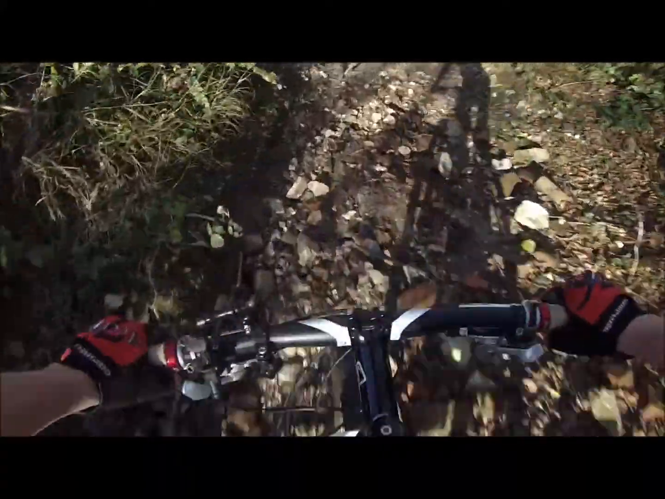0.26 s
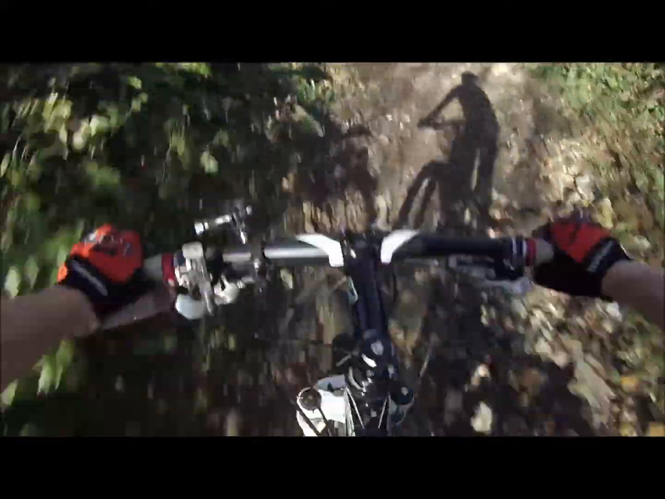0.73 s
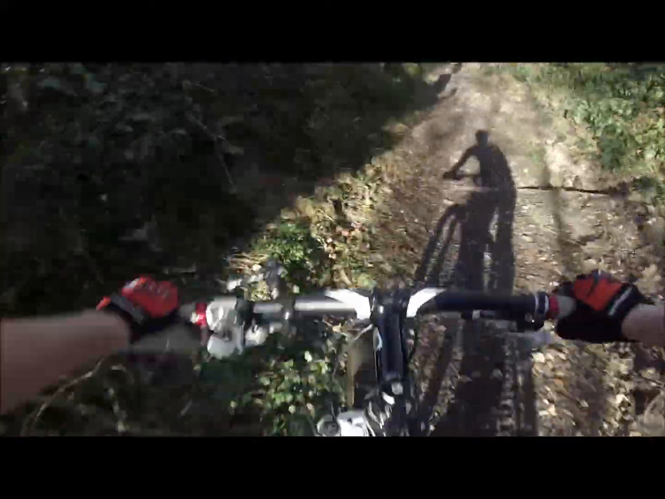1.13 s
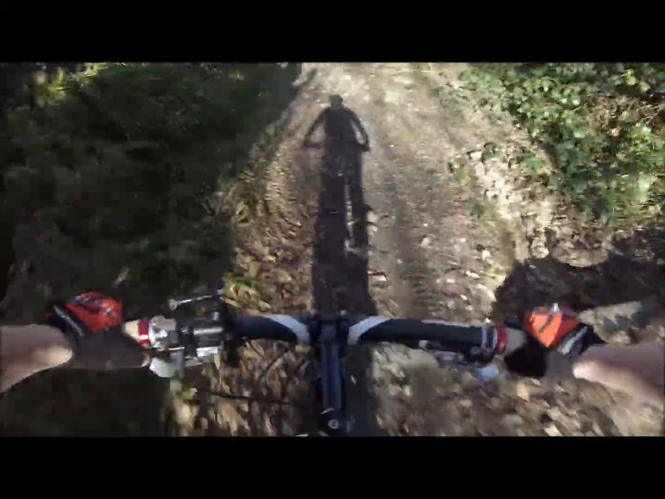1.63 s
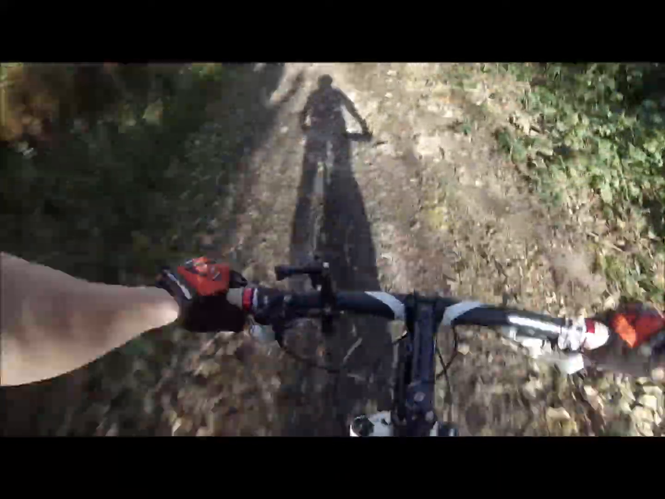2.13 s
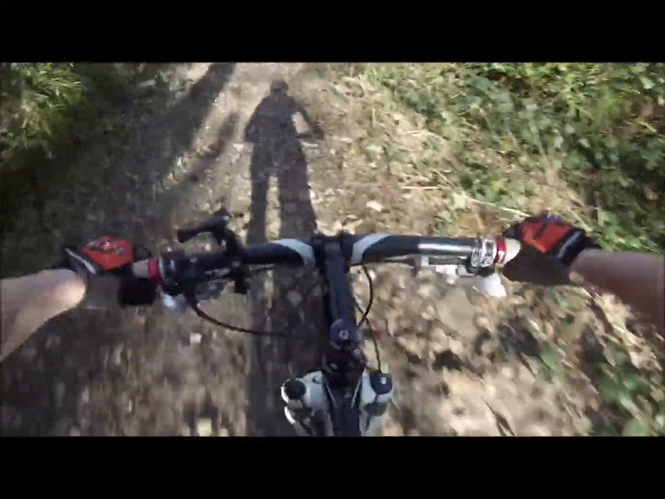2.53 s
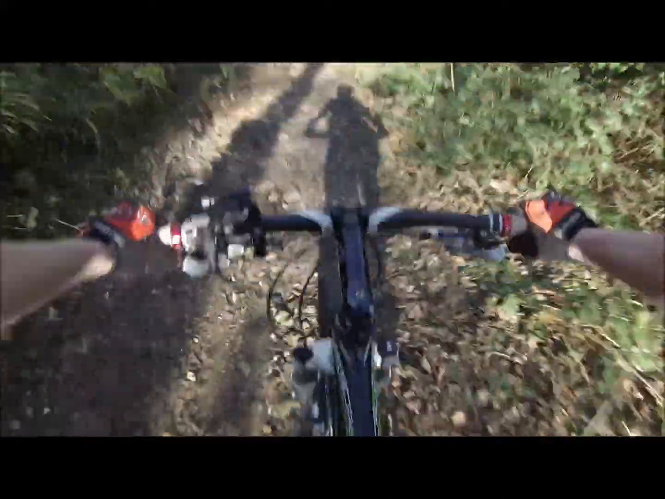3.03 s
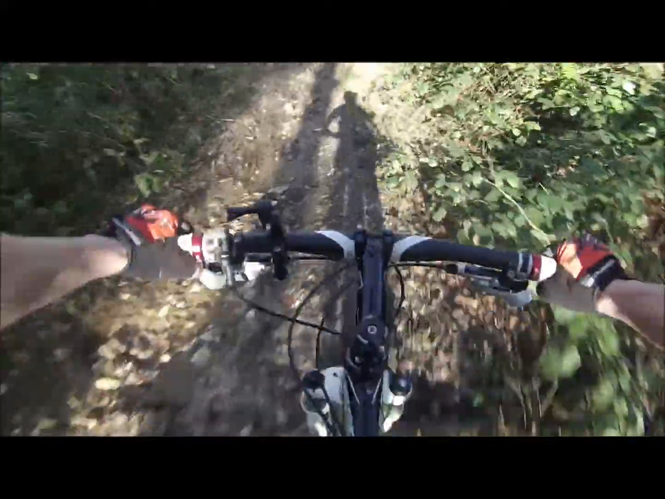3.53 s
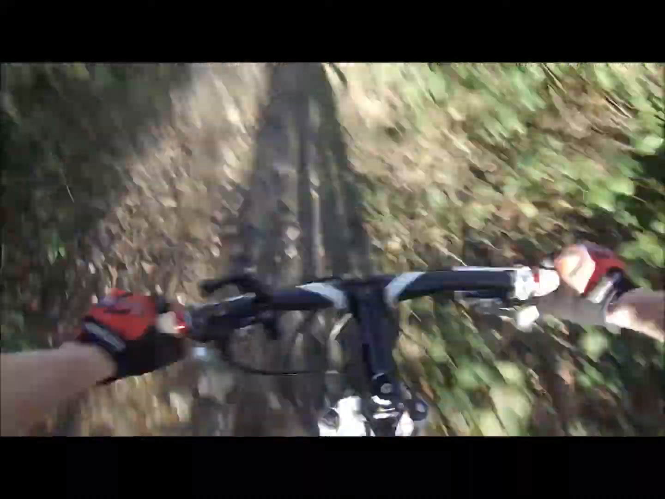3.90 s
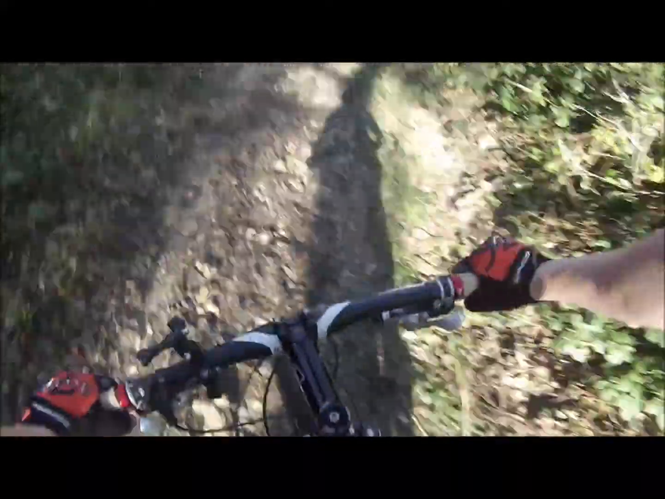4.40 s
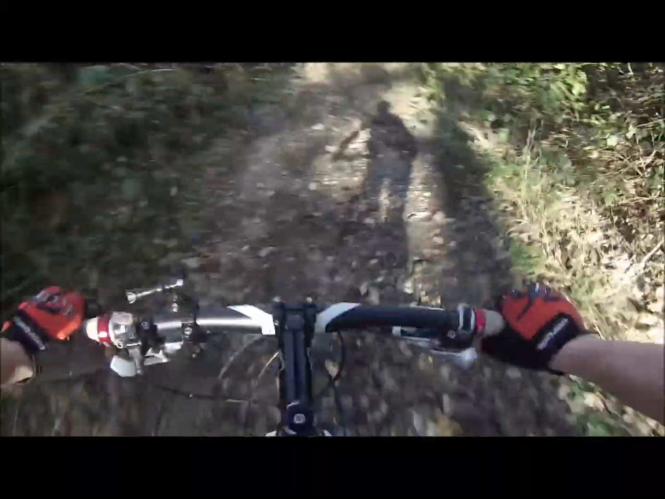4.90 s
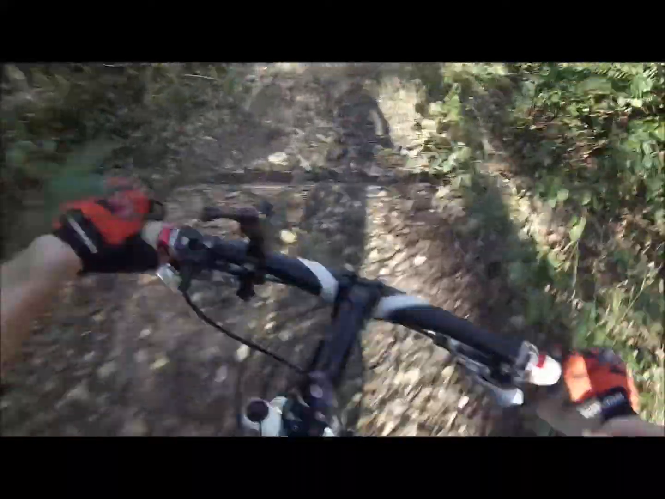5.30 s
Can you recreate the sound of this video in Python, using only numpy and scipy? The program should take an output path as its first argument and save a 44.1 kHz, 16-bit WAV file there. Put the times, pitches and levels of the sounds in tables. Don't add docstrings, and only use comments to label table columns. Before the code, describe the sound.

Muffled rough bike ride heard from inside a plastic housing: dense scratchy creaking, low tyre rumble, heavy jolts and short hollow clacks.

```python
import sys
import numpy as np
from scipy import signal
from scipy.fft import rfft, irfft
from scipy.io import wavfile
from scipy.ndimage import uniform_filter1d

SR = 44100
rng = np.random.default_rng(int(sys.argv[2]) if len(sys.argv) > 2 else 0)


def put_to_file(sound):
    columns = np.atleast_2d(sound).T
    safe = np.clip(columns, -1, 1)
    whole_steps = np.round(safe * 32767)
    wavfile.write(sys.argv[1], SR, whole_steps.astype(np.int16))


def invert_db(level):
    return 10 ** (np.asarray(level, dtype=float) / 20)


N = 244755


def evened(x):
    return x / np.sqrt(np.mean(x ** 2) + 1e-20)


def add(mix, s, sound):
    part = mix[max(round(s * SR), 0):][:len(sound)]
    part += sound[:len(part)]


def control(curve):
    return np.interp(np.arange(N) / SR, *np.transpose(curve))


def humps(rows, column):
    t = np.arange(0, N + 64, 64) / SR
    db = sum(row[column] * np.exp(-((t - row[0]) / row[-1]) ** 2) for row in rows)
    return np.interp(np.arange(N) / SR, t, db)


def flutter(span_s, depth_db):
    size = max(int(span_s * SR), 2)
    drift = uniform_filter1d(uniform_filter1d(rng.standard_normal(N), size), size)
    return invert_db(depth_db * np.clip(evened(drift), -3, 1.6))


def coloured(points):
    hz, db = np.transpose(points)
    bins_hz = np.fft.rfftfreq(N, 1 / SR)
    gain = invert_db(np.interp(np.log(bins_hz + 1), np.log(hz + 1), db))
    return evened(irfft(rfft(rng.standard_normal(N)) * gain, N))


def resonances(x, table):
    out = np.zeros(N)
    for k, (hz, width_hz, db) in enumerate(table):
        b, a = signal.iirpeak(hz, hz / (1.69 * width_hz), SR)
        excited = x * flutter(0.013, 2.26)
        twice = signal.lfilter(b, a, signal.lfilter(b, a, excited))
        out += (-1) ** k * invert_db(db) * evened(twice)
    return out


# [t/s, chafing level/dB]
MOUNT_PRESSURE = [(0.0, -46.5), (0.14, -42.5), (0.46, -40.5), (0.94, -42), (1.95, -45.5), (2.19, -46),
                  (2.3, -46), (2.4, -44.5), (3.09, -41.5), (3.23, -42.5), (3.41, -48), (3.73, -43.5),
                  (3.85, -48), (3.96, -46), (4.48, -44.5), (4.71, -39.5), (4.81, -44.5), (5.55, -44.5)]
# [t/s, mount level/dB, ground level/dB, half length/s]
LULLS = [(.22, -3, -6, 0.037), (.255, -9.5, -2, .02), (.46, -2, -6, 0.028), (1.03, -5, 0.5, .03),
         (1.52, -3, -2.5, 0.03), (1.93, -6.5, -0.5, 0.055), (2.3, -4.5, -3, 0.044), (2.6, -6, -2.5, 0.043),
         (3.47, -2.5, -5, 0.037), (3.54, -3.5, -6, 0.087), (3.91, -7, -11, 0.036), (4.24, -3, -11, 0.047),
         (4.93, -6.5, -5.5, 0.026), (5.33, -2.5, -4, 0.048), (5.49, -4.5, -1, 0.023)]
# [t/s, treble peak level/dB, body relative level/dB, length/s]
SCRAPES = [(.273, -28, 4, 0.029), (0.38, -25, -19, 0.018), (0.536, -34, 16.5, 0.014),
           (0.578, -34.5, 11, 0.019), (0.733, -23, -1, 0.027), (0.7965, -27.5, 3.5, 0.023),
           (0.8626, -31.5, 8.5, 0.052), (1.114, -23.5, 2.5, 0.03), (1.32, -33, 4, 0.05),
           (1.493, -32.5, 0, .027), (2.065, -36.5, 0, .057), (2.781, -34, 14, 0.017),
           (2.906, -32, -3, 0.044), (3.069, -28, 3, 0.029), (3.142, -23.5, 4.5, 0.037),
           (3.2823, -24.5, 6.5, 0.025), (3.365, -24.5, 5.5, .036), (3.601, -32.5, 2, .051),
           (3.699, -31.5, 7, .026), (3.846, -30.5, 10, 0.023), (3.9538, -28, 8, 0.028),
           (4.108, -28, 2.5, 0.049), (4.527, -34.5, 7.5, 0.027), (4.751, -28, -0.5, 0.052),
           (4.822, -28, 7.5, 0.026), (4.898, -22, 7, .024), (5.046, -27, 0.2, 0.039), (5.13, -25, 0, 0.023),
           (5.218, -28.5, 3, .033), (5.5403, -27, 6, .032)]
# [t/s, treble peak level/dB, body relative level/dB]
RUBS = [(.043, -39.5, 5), (0.109, -45, 16), (0.462, -39, 6.5), (0.658, -44, -23), (.75, -40.5, 19),
        (.945, -35.5, 3.5), (1.046, -33.5, 7), (1.208, -34, 5.5), (1.4486, -32.5, 3), (1.541, -44, 0),
        (1.778, -41, -21), (1.81, -33.5, -6), (1.854, -38.5, 3.5), (1.924, -35, 0.5), (2.105, -42, 12),
        (3.01, -35.5, 6), (3.237, -42, -20), (3.418, -38.5, 1), (3.736, -31.5, 4.5), (3.772, -39, 4),
        (4.194, -32.5, 3), (4.365, -38.5, 3.5), (4.458, -40, 6.5), (4.495, -32.5, 2.5), (4.859, -51, 18),
        (4.995, -35, -5), (5.1, -32.5, 16), (5.178, -32, 7.5), (5.332, -35, 1.5), (5.405, -32, 2)]
# [f/Hz, width/Hz, level/dB]
HOUSING_BODY = [(1295.5, 268, -4), (1465, 187, 0), (1599.5, 222, -1), (2114, 178, -8.5), (2367, 285, -11),
                (2704, 147, -14), (705, 83, -23.5)]
# [f/Hz, width/Hz, level/dB]
HOUSING_SHELL = [(3042, 134, -2), (3482, 210, -2), (3927, 210, -2.5), (4963, 600, 3), (5910, 320, -5),
                 (6147, 680, -4.5), (7850, 610, -19.5), (8600, 260, -17), (9330, 280, -23),
                 (10340, 550, -17.5), (12140, 1650, -21), (14300, 1800, -23)]


def chafing():
    ticks = rng.standard_normal(N) * (rng.random(N) < 9000 / SR)
    ticks *= invert_db(2.28 * np.minimum(rng.exponential(1, N), 3))
    ticks = evened(ticks) * flutter(0.0072, 2.26)

    usual_db, body_db, treble_db = -44, 2, -12
    treble_slope = 0.92
    press_db = control(MOUNT_PRESSURE) + humps(LULLS, column=1) - usual_db
    body = invert_db(usual_db + body_db + press_db) * flutter(0.0082, 0.95)
    shell = invert_db(usual_db + body_db + treble_db + treble_slope * press_db) * flutter(0.024, 0.92)

    t = np.arange(8000) / SR
    strokes = [row + (0.017,) for row in SCRAPES]
    strokes += [row + (0.035, 0.02) for row in RUBS]
    for s, peak_db, relative_db, length_s, rise_s in strokes:
        swell = np.sin(np.pi / 2 * np.clip(t / rise_s, 0, 1)) ** 2
        shape = swell * np.exp(-(t / length_s) ** 3.8)
        add(shell, s - 0.008, invert_db(peak_db - 15.0) * shape)
        add(body, s - 0.008, invert_db(peak_db + relative_db - 9.5) * shape)

    out = np.zeros(N)
    for level, table in ((body, HOUSING_BODY), (shell, HOUSING_SHELL)):
        steady_level = np.std(resonances(ticks, table))
        loudness = np.sqrt(np.mean(level ** 2))
        out += resonances(ticks * level, table) * loudness / steady_level
    return out


# [t/s, tyre rumble level/dB]
TRAIL = [(0.0, -45.5), (0.25, -39), (0.51, -35), (0.74, -33), (1.02, -38), (1.24, -40), (1.71, -45),
         (2.72, -41.5), (3.06, -34), (3.41, -42.5), (3.69, -39.5), (3.86, -31), (3.96, -33), (4.13, -35),
         (4.36, -39.5), (4.5, -39), (4.82, -35), (5.55, -44.5)]
# [t/s, swell level/dB, half length/s]
HEAVES = [(.2, 3, 0.067), (.29, 11.5, 0.022), (.4, 11, 0.029), (.63, 8, 0.1), (.9, 11, 0.12),
          (1.22, 8, 0.053), (1.48, 8, 0.043), (1.8, 6.5, 0.075), (2.24, 7, 0.073), (2.46, 5.5, 0.047),
          (2.58, 13, 0.032), (2.84, 14, 0.052), (3.08, 8.5, 0.097), (3.34, 6, 0.099), (3.54, 9, .06),
          (3.66, 12, 0.034), (3.8, 4, .04), (3.97, 1, 0.026), (4.17, 6, 0.054), (4.33, 14, 0.082),
          (4.44, 9.5, .05), (4.6, 7.5, 0.076), (4.74, 6, .05), (5.28, 8, 0.062), (5.39, 7.5, 0.036)]
# [f/Hz, level/dB per Hz]
SWAY_SPECTRUM = [(2.9, -39), (5.0, 1.5), (22, 7.5), (45, -12.5), (58, -42), (99, -120)]
# [f/Hz, level/dB per Hz]
TYRE_SPECTRUM = [(26, -18), (45, -5), (86, -12.5), (210, -17), (347, -34), (499, -36.5), (900, -39),
                 (1980, -73)]
# [t/s, peak level/dB, f/Hz, length/cycles]
BUMPS = [(0.292, -27, 77, 1.2), (0.373, -24, 72, 3.1), (0.533, -30, 72.7, 0.91), (0.706, -31.5, 196, 0.88),
         (1.282, -48, 118, 2.3), (1.373, -30, 183, 1), (1.455, -37, 72.7, 1.3), (1.826, -30, 200, 1.3),
         (2.077, -14, 71, 2.35), (2.224, -44, 111, 1.6), (2.29, -24.5, 72.7, 1), (2.406, -32, 192, 1.5),
         (2.496, -14, 102, 1.2), (2.676, -37, 70.6, 1.4), (2.94, -25, 72, 1.3), (3.028, -19, 126, 1.8),
         (3.067, -12, 76, 1.6), (3.142, -16.5, 71.6, 1.4), (3.618, -24.5, 193, 1.3), (3.682, -30, 75, 1.5),
         (3.732, -29, 153, 1.1), (3.82, -23, 72.7, 2.5), (4.03, -24, 100, 1.3), (4.283, -23, 99.6, 1.2),
         (4.374, -28, 119, 1.3), (4.552, -15.5, 72, 1.8), (4.704, -21.5, 99.6, 1.6), (4.82, -22, 73.4, 1.1),
         (4.988, -26, 154, 1.5), (5.24, -25, 73, 1.1)]
# [t/s, level/dB, half width/s, direction +1 or -1]
JOLTS = [(0.5508, -8.5, 0.0043, 1), (0.587, -8.5, 0.0039, -1), (0.74, -9.5, 0.0073, -1),
         (0.814, -15, 0.0016, -1), (.8713, -12, 0.011, -1), (0.8836, -12.5, 0.0019, 1),
         (0.9074, -10, 0.0034, -1), (1.0632, -13.5, 0.0015, -1), (2.092, -13.5, 0.0038, 1),
         (2.856, -11, 0.0043, -1), (3.068, -18, 0.0051, 1), (3.2023, -20, 0.0018, -1),
         (3.28, -21, 0.0028, -1), (3.7063, -11.5, 0.0021, -1), (3.787, -14.5, 0.0062, -1),
         (3.8018, -9, 0.0031, 1), (3.8467, -10.5, 0.0041, -1), (3.857, -8.5, 0.0025, -1),
         (3.8616, -2, 0.0017, -1), (3.8621, -13, 0.000075, -1), (3.8715, -10.5, 0.0037, 1),
         (3.952, -14, 0.0023, 1), (3.9562, -8, 0.0027, -1), (3.9622, -4.5, 0.0019, -1),
         (3.967, -14, 0.0017, -1), (3.9748, -6, .004, 1), (4.1108, -11, 0.0016, -1),
         (4.4633, -15, 0.0016, -1), (4.9128, -6.5, 0.0047, -1), (4.922, -10.5, 0.0017, 1)]


def shaking():
    usual_db, rumble_db, sway_db = -42, 1, -29
    sway_slope = 0.49
    ground_db = control(TRAIL) + humps(LULLS, column=2) - usual_db
    heave_db = humps(HEAVES, column=1)
    out = coloured(SWAY_SPECTRUM) * invert_db(sway_db + sway_slope * ground_db + heave_db)
    out += coloured(TYRE_SPECTRUM) * invert_db(usual_db + rumble_db + ground_db) * flutter(0.014, 4.6)

    for s, db, hz, cycles in BUMPS:
        phase = np.arange(0, 4 * cycles / hz, 1 / SR) * hz
        age = phase / cycles * 4
        add(out, s - 0.004, -invert_db(db - 5.0) * np.sin(2 * np.pi * phase) * age * np.exp(1 - age))

    t = np.arange(-1500, 1500) / SR
    for s, db, width_s, direction in JOLTS:
        point = np.exp(-0.8 * abs(t / width_s) ** 1.58)
        add(out, s - 1500 / SR, direction * invert_db(db) * point)
    return out


def ring(hz, db, t60, rise_s):
    t = np.arange(3000) / SR
    rise = (1 - np.exp(-t / rise_s)) ** 1.38
    return invert_db(db - 60 * t / t60) * rise * -np.sin(2 * np.pi * hz * t)


# [t/s, peak level/dB, upper modes relative level/dB]
KNOCKS = [(0.296, -32.5, 8), (0.4375, -47, 26), (0.492, -48.5, 25), (0.5015, -50, 25), (0.534, -41, 0),
          (0.754, -35.5, -2), (1.381, -23.5, -2), (1.825, -38, 7), (1.937, -43.5, -1), (2.409, -45.5, 25),
          (2.503, -13.5, 3.5), (2.762, -38.5, -5), (2.944, -36, 21.5), (2.993, -42, 18), (3.077, -14, 5),
          (3.703, -38, 13), (3.796, -23.5, 4.5), (4.037, -18, 8), (4.291, -22, 3), (4.528, -48, 24),
          (4.5916, -41, 25.5), (4.963, -35, -12), (5.107, -41.5, 31.5), (5.439, -40, -5), (5.538, -43, 17)]
# [f/Hz, level/dB, t60/s, share of the upper-mode level 0..1]
CASE_MODES = [(687, 3.5, 0.028, 0), (1353, 7.5, 0.014, 0.73), (1625, -4, 0.012, 0.26),
              (2020, -10.5, 0.015, 1), (2480, -14.5, 0.013, 0.53), (5110, -25, 0.011, 1),
              (140, 3, 0.019, 0.36)]
# [t/s, step level/dB, relaxation/s]
LATCH_SLIP = (.3822, -12, 0.025)
# [t/s, level/dB, modes [f/Hz, level/dB, t60/s]]
METAL_TICK = (4.1125, -24.5, [(6460, 6.5, 0.012), (5700, 1, 0.012), (7500, -3, 0.016), (11000, -16, 0.01),
              (2850, -1, 0.019), (1396, 4.5, 0.046)])


def knocks():
    out = np.zeros(N)
    for s, db, upper_db in KNOCKS:
        for hz, mode_db, t60, upper in CASE_MODES:
            tune = rng.uniform(1.0, 1.015)
            level_db = db + mode_db + upper * upper_db + 4.5
            add(out, s - 0.001, ring(hz * tune, level_db, t60, 0.0013))

    s, db, relax_s = LATCH_SLIP
    add(out, s, invert_db(db) * np.exp(-np.arange(4000) / SR / relax_s))

    tiny_tick = ring(11300, -48, 0.0074, 0.0003) + ring(6000, -44, 0.0046, 0.0003)
    add(out, 1.9365, tiny_tick)

    s, db, modes = METAL_TICK
    for hz, mode_db, t60 in modes:
        add(out, s, ring(hz, db + mode_db, t60, 0.00056))
    return out


def scene():
    hiss = invert_db(-78) * rng.standard_normal(N)
    treble_limit = signal.firwin(511, 15250, window=("kaiser", 9), fs=SR)
    steady = signal.oaconvolve(chafing() + shaking() + hiss, treble_limit, "same")
    b, a = signal.butter(1, 4 / SR * 2, "high")
    mono = signal.lfilter(b, a, steady + knocks())
    return np.array([mono, mono])


# [start t/s, end t/s]
APART = [
    (.39, .43),
    (.54, .75),
    (.8, 1.0),
    (2.84, 2.96),
    (3.77, 4.19),
    (4.45, 4.48),
    (4.89, 5.08),
]


def patchy_stereo(mono):
    hz, t, z = signal.stft(mono, SR, nperseg=1024)
    hz = hz[:, None]
    patches = rng.random((len(t) // 4 + 1, 129))
    patches = np.repeat(np.repeat(patches, 4, axis=0), 4, axis=1)[:len(t), :513].T
    dropped = (patches < np.clip((hz - 12000) / 4800, 0, 1)) & (abs(z) < invert_db(-92))

    apart = sum((t > start) & (t < end) for start, end in APART)
    low_peak = abs(z[2:6]).max(axis=0) * invert_db(3 * rng.standard_normal(len(t)))
    reach_hz = np.where(low_peak > invert_db(-27), 13500, 1300)
    smear = np.exp(uniform_filter1d(np.log(abs(z) + 1e-7), size=15, axis=0))
    grit = invert_db(-18.5) * (smear + invert_db(-78) * (hz > 1300)) * apart * (hz < reach_hz)

    patchy = uniform_filter1d(rng.standard_normal(len(t)), size=9) > 0.05
    other_patches = np.roll(patches, 99, axis=1)[::-1] < 0.5
    whisper = invert_db(-103) * (hz > 6800) * (hz < 10000) * patchy * other_patches
    side = (grit + whisper) * np.exp(2j * np.pi * rng.random(z.shape))

    mid, side = signal.istft(np.array([z * ~dropped, side]), SR, nperseg=1024)[1][:, :N]
    return np.array([mid + side, mid - side])


def low_pass(x):
    return signal.sosfilt(signal.butter(12, 16000, fs=SR, output="sos"), x)


def record(dry):
    mix = patchy_stereo(dry[0])
    return low_pass(mix)


dry = scene()
out = record(dry)
put_to_file(out)
```